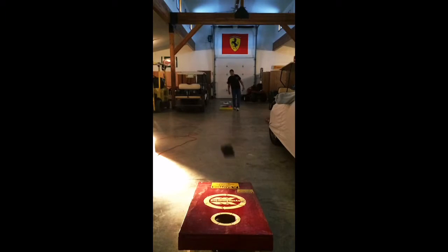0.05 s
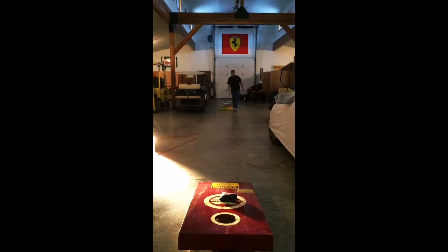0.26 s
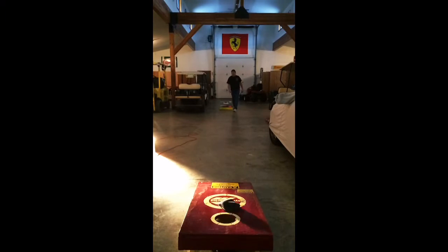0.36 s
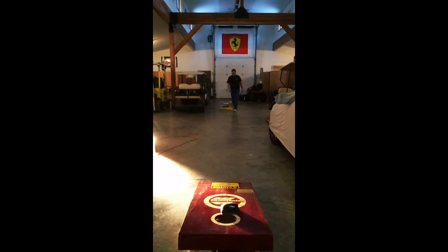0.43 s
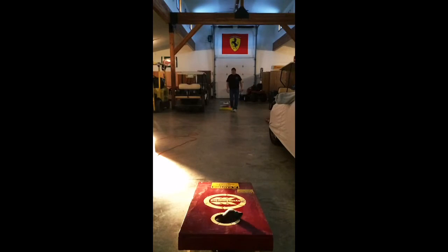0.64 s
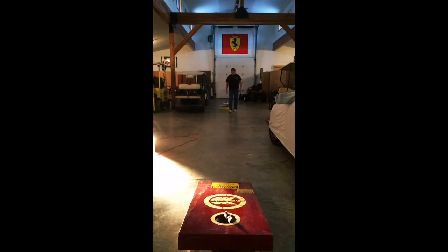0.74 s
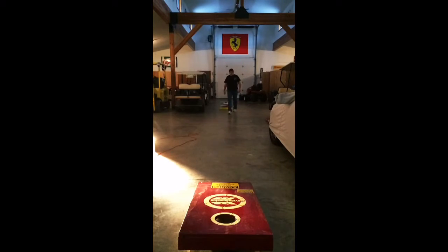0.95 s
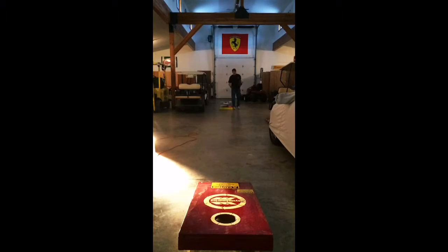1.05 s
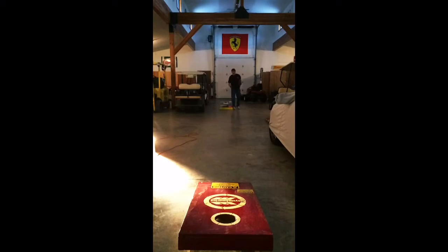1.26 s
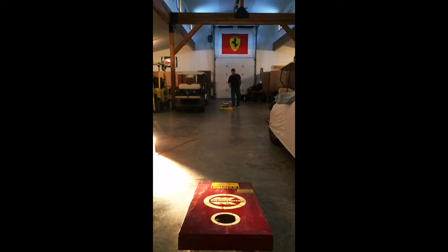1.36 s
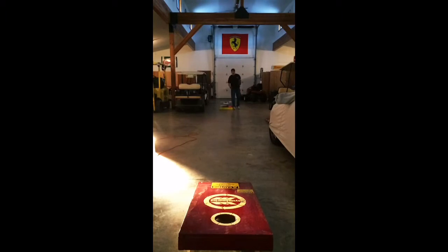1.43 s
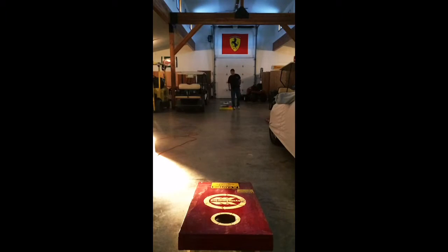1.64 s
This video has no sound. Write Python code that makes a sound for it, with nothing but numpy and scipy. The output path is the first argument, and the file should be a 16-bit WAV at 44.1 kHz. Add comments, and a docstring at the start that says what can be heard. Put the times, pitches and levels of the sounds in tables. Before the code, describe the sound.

A sharp, low thud rings around a big garage as a beanbag hits a plywood board, its filling crunching briefly. Faint cloth rubbing follows as it slips through the hole, leaving only a quiet rumble and hum.

```python
"""A low hum and a faint hiss fill a large garage. A beanbag lands on a hollow plywood board:
its filling crunches, the board booms, and booms again as the bag flops down.
The bag slides along the wood and brushes through the hole while the garage echoes.
After about a second the echo and the brushing break off, and a rumble comes up over the hum."""
import sys
import numpy as np
from scipy import signal
from scipy.fft import rfft, irfft
from scipy.io import wavfile
from scipy.ndimage import uniform_filter1d

SR = 44100
rng = np.random.default_rng(int(sys.argv[2]) if len(sys.argv) > 2 else 0)


def bounce(signal):
    """Save signal as a 16-bit WAV file at the path given by the first command-line argument."""
    frames = np.transpose(np.atleast_2d(signal))
    limited = np.clip(frames, -1, 1)
    pcm = np.round(limited * 32767).astype(np.int16)
    wavfile.write(sys.argv[1], SR, pcm)


N = 74970  # 1.7 s


def gain(db):
    """Turn decibels into a multiplier."""
    return 10 ** (np.asarray(db) / 20)


def normalise(x):
    """Scale to an average strength (rms) of 1."""
    return x / np.sqrt(np.mean(x ** 2))


def since(start):
    """Seconds since a moment, zero before it."""
    return np.maximum(np.arange(N) / SR - start, 0)


def fade(age, ring_s):
    """Die away by 60 dB in one ring time."""
    return np.exp(-np.log(1000) * age / ring_s)


def look_up(hz, points, values):
    """Read between a table's rows, with octaves evenly spaced."""
    return np.interp(np.log(np.maximum(hz, 1)), np.log(points), values)


def colour(x, table, size=4096):
    """Give a sound the table's balance of bass and treble; white noise keeps its power."""
    hz, db = np.array(table).T
    gains = normalise(gain(look_up(np.fft.rfftfreq(size, 1 / SR), hz, db)))
    cepstrum = irfft(np.log(gains))
    # fold it so the filter never sounds before its input
    cepstrum[1:size // 2] *= 2
    cepstrum[size // 2 + 1:] = 0
    return signal.oaconvolve(x, irfft(np.exp(rfft(cepstrum))))[:N]


def grains(spread_db):
    """Dense clicks of uneven size."""
    return normalise(rng.standard_normal(N) * gain(spread_db * rng.standard_normal(N)))


def wobble(rate_hz):
    """A random drift up and down, about 1 in size."""
    hold = int(SR / rate_hz)
    steps = np.repeat(rng.standard_normal(N // hold + 1), hold)
    return normalise(uniform_filter1d(steps, hold)[:N])


def tone(hz, db):
    """A steady pure tone at an average (rms) level."""
    return np.sqrt(2) * gain(db) * np.sin(2 * np.pi * (hz * since(0) + rng.random()))


# tones of the hum (pitch [Hz], level [dB])
HUM_TONES = [(119, -59), (360, -75)]
# colour of the hiss (frequency [Hz], relative level [dB])
HISS_COLOUR = [(30, -15.5), (120, 2.5), (200, -12.5), (400, -15), (800, -17), (1500, -20), (2500, -29),
               (6000, -32.5), (15000, -37.5)]
def hum_and_hiss():
    """A low hum and faint, airy noise carry on throughout."""
    hiss = gain(-64) * colour(rng.standard_normal(N), HISS_COLOUR)
    return hiss + sum(tone(hz, db) for hz, db in HUM_TONES)


def corner_touch(start_s=0.19, cutoff_hz=238):
    """A corner of the bag presses softly on the board just before its weight arrives."""
    swell = np.interp(since(0), [start_s, BOARD_BLOWS[0][0], BOARD_BLOWS[1][0]], [0, 1, 0])
    keep_lows = signal.butter(2, cutoff_hz, fs=SR, output="sos")
    return gain(-29) * swell ** 2 * normalise(signal.sosfilt(keep_lows, rng.standard_normal(N)))


# strokes of cloth on wood (start [s], peak [s], end [s], level [dB])
CLOTH_RUBS = [(0.191, 0.202, 0.22, -55), (0.58, 0.77, 0.96, -59), (0.842, 0.87, 0.96, -62.5),
              (0.905, 0.911, 0.954, -52.5), (0.919, 0.949, 0.966, -46.5), (0.957, 0.967, 1.052, -56)]
# colour of the rubbing (frequency [Hz], relative level [dB])
CLOTH_COLOUR = [(100, 0.5), (500, 8), (1000, -2), (1700, 2), (3000, -2), (6000, -8), (10000, -10.5),
                (15500, -14)]
def cloth_rub():
    """The bag grazes the board, slides, and brushes the rim of the hole."""
    level = sum(gain(db) * np.interp(since(0), [start, peak, end], [0, 1, 0])
                for start, peak, end, db in CLOTH_RUBS)
    flutter = gain(0.5 * wobble(rate_hz=140))
    return colour(level * flutter * grains(spread_db=3.5), CLOTH_COLOUR)


# the bag's blows on the board (time [s], relative level [dB], contact time [ms])
BOARD_BLOWS = [(0.2196, -1, 0.56), (0.2308, -4.5, 0.35), (0.257, 3, 1.33), (0.2797, -6, 1.46)]
# notes the board rings at (pitch [Hz], relative level [dB], ring time [s])
BOARD_NOTES = [(128, -33, .2), (165.8, -19, 0.46), (180, -14, 0.25), (265.3, -19.5, 0.19),
               (329.8, -15, 0.091), (403.8, -15.5, 0.14), (447, -23.5, 0.11), (600, -17.5, 0.046),
               (660.8, -14, 0.16), (694.7, -19, .14), (1024, -22, 0.048), (1328, -14, 0.043),
               (1640, -9, 0.021), (1704, -6, 0.024)]
def board_boom(bass_cut_hz=93):
    """Each blow sets the board ringing; a longer contact leaves only the low notes."""
    t = since(0)[:N // 2]
    ring = sum(gain(db) * np.cos(2 * np.pi * hz * t) * fade(t, ring_s) for hz, db, ring_s in BOARD_NOTES)
    force = np.zeros(N)
    for start, db, contact_ms in BOARD_BLOWS:
        progress = np.minimum(4000 * since(start) / contact_ms, 50)
        push = progress * np.exp(-progress)  # strongest a quarter of the way into the contact
        force += gain(db) * push / push.sum()
    # the board gives off little deep bass
    cut_bass = signal.butter(2, bass_cut_hz, "high", fs=SR, output="sos")
    return signal.sosfilt(cut_bass, signal.fftconvolve(force, ring)[:N])


# colour of the clatter (frequency [Hz], relative level [dB])
CLATTER_COLOUR = [(40, -22.5), (90, -29.5), (150, 5), (300, 5.5), (520, 2.5), (750, -4), (1050, -2.5),
                  (1200, -19), (1400, -7.5), (1800, -10.5), (2200, -19), (8000, -35)]
def board_clatter():
    """The many weaker notes of the board's top and frame blur into a short woody noise."""
    age = since(BOARD_BLOWS[0][0])
    burst = (age > 0) * fade(age, ring_s=0.33) * rng.standard_normal(N)
    return gain(-16.5) * colour(burst, CLATTER_COLOUR)


# bursts of the filling as the bag flattens (time [s], level [dB], decay time [s])
CRUNCH_BURSTS = [(0.2200, -12.5, 0.0038), (0.2278, -26, .004)]
# colour of the crunch (frequency [Hz], relative level [dB])
CRUNCH_COLOUR = [(40, 0), (200, 5.5), (800, -1), (1200, -1.5), (1450, 0.5), (1850, 0), (2300, -4.5),
                 (3100, -7), (4500, -11.5), (7000, -11.5), (11000, -15.5), (15500, -30)]
def filling_crunch(rise_s=0.0033, settle_db=-29, settle_s=0.057):
    """The pellets in the bag clash in short bursts, then settle."""
    age = since(CRUNCH_BURSTS[0][0])
    level = gain(settle_db) * np.exp(-age / settle_s) * (age > 0)
    for peak, db, decay_s in CRUNCH_BURSTS:
        rise = np.minimum(since(peak - rise_s) / rise_s, 1)
        level += gain(db) * rise ** 2 * np.exp(-since(peak) / decay_s)
    return colour(level * grains(spread_db=4), CRUNCH_COLOUR)


def crunch_at_walls():
    """One click with the crunch's colour stands for the whole crunch reaching the walls."""
    click = signal.unit_impulse(N, int(CRUNCH_BURSTS[0][0] * SR))
    return gain(10) * colour(click, CRUNCH_COLOUR)


# the garage's echo (frequency [Hz], level [dB], ring time [s])
ECHO_BANDS = [(49.96, -14.5, 0.89), (110, -7.5, 2.3), (180, -13, 1.6), (280, -4, 1.13), (500, -10.5, 1.64),
              (1000, -9.5, 2.2), (1720, -5, 1.7), (3000, -6.5, 1.19), (6000, -7.5, 0.58),
              (14180, -21, 0.39)]
def garage_echo(sound, bands=16, delay_s=0.012, build_s=0.0048):
    """The garage smears sound into an echo: low and middle pitches linger, the treble dies fast."""
    hz, db, ring_s = np.array(ECHO_BANDS).T
    centres = np.geomspace(60, 14000, bands)
    band_position = look_up(np.fft.rfftfreq(N, 1 / SR), centres, np.arange(bands))
    noise_spectrum = rfft(rng.standard_normal(N))
    age = since(delay_s)
    build = 1 - np.exp(-age / build_s)
    tail = np.zeros(N)
    for k, centre in enumerate(centres):
        share = np.maximum(1 - abs(band_position - k), 0)
        band = irfft(noise_spectrum * share, N) * build * fade(age, look_up(centre, hz, ring_s))
        band *= np.sqrt(np.mean(share ** 2) / np.sum(band ** 2))  # ringing longer adds no energy
        tail += gain(look_up(centre, hz, db)) * band
    return signal.fftconvolve(sound, tail)[:N]


# colour of the rumble (frequency [Hz], relative level [dB])
RUMBLE_COLOUR = [(30, -21.5), (70, -4.5), (110, 2), (180, -1.5), (250, -11), (400, -13), (550, -17),
                 (750, -18.5), (1100, -23), (1500, -29), (2000, -33), (4000, -42), (8000, -49.5),
                 (15000, -60)]
# tones within the rumble (pitch [Hz], level before wavering [dB])
DRONE_TONES = [(177.6, -54.5), (350, -67), (673, -71.5), (780, -71.5)]
def late_rumble(start_s=1.01, rise_s=0.017):
    """A low rumble comes up quickly and stays, with wavering tones and a thin whine in it."""
    noise = gain(-49) * colour(rng.standard_normal(N), RUMBLE_COLOUR)
    drone = sum(tone(hz, db) * (1 + 0.79 * wobble(rate_hz=44)) for hz, db in DRONE_TONES)
    whine = tone(hz=1368, db=-72.5) * (1 + 0.14 * wobble(rate_hz=24.5))
    return np.minimum(since(start_s) / rise_s, 1) * (noise + drone + whine)


def scene(break_s=1.018, break_fade_s=0.014):
    """The bag lands and slides; its sound and echo break off while the background goes on."""
    wood = corner_touch() + board_boom() + board_clatter()
    cloth = cloth_rub()
    echo = garage_echo(wood + crunch_at_walls() + gain(-10) * cloth)
    break_off = 1 - np.minimum(since(break_s) / break_fade_s, 1)
    throw = break_off * (wood + filling_crunch() + cloth + echo)
    return (hum_and_hiss() + throw + late_rumble())[None, :]


def record(dry, top_hz=15500):
    """Round off the loudest peaks and cut the highest treble."""
    cut_treble = signal.ellip(10, .2, 80, top_hz, fs=SR, output="sos")
    return signal.sosfilt(cut_treble, np.tanh(dry))


dry = scene()
out = record(dry)
bounce(out)
```